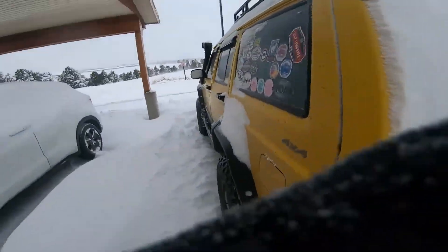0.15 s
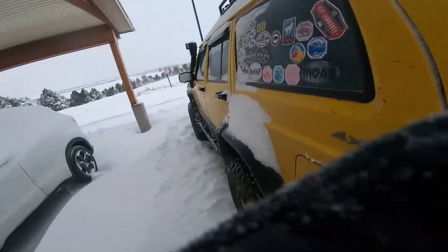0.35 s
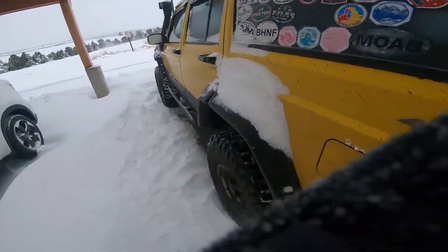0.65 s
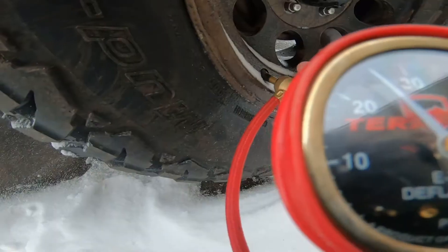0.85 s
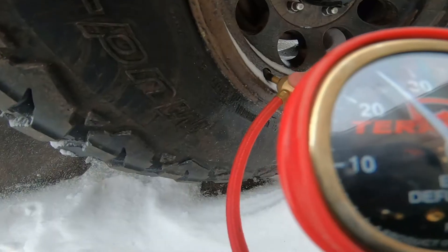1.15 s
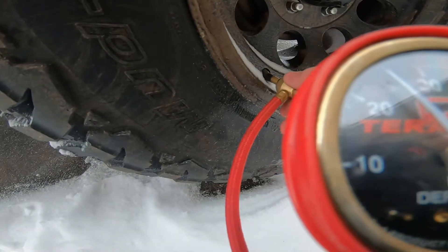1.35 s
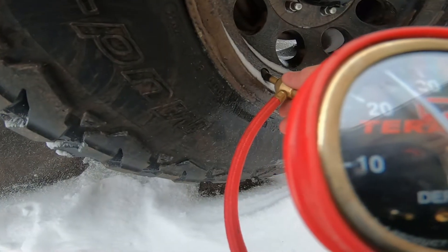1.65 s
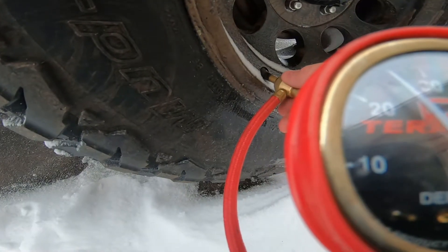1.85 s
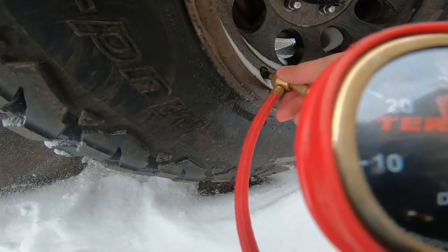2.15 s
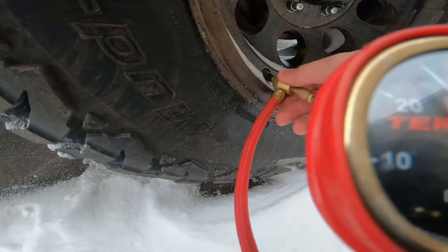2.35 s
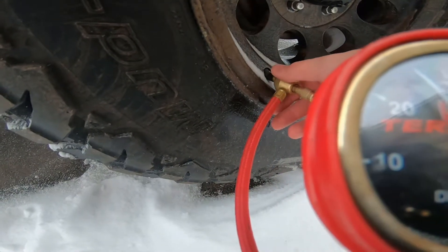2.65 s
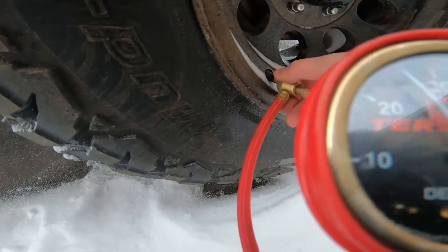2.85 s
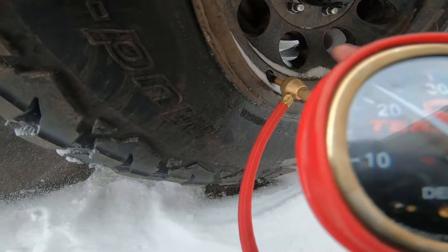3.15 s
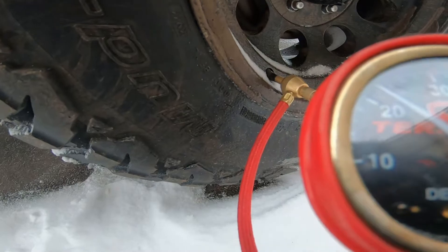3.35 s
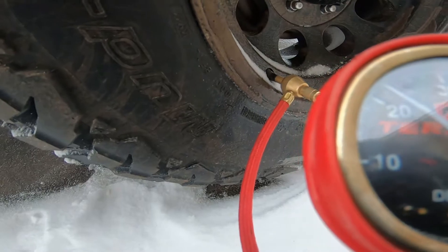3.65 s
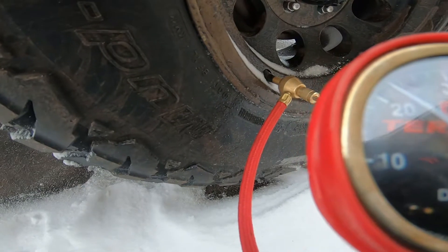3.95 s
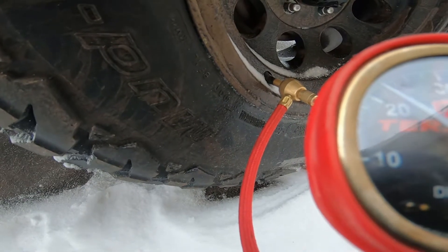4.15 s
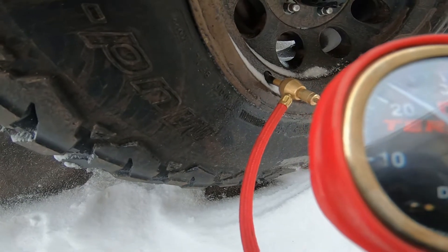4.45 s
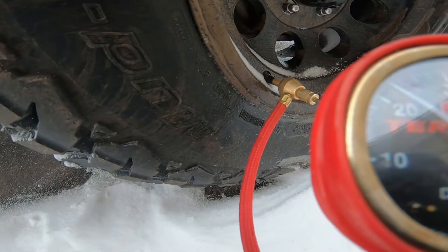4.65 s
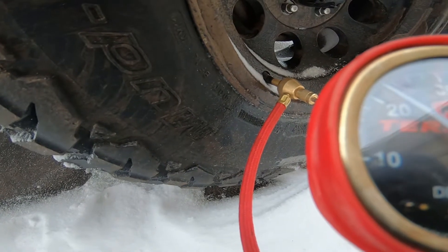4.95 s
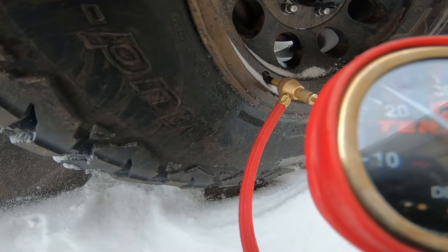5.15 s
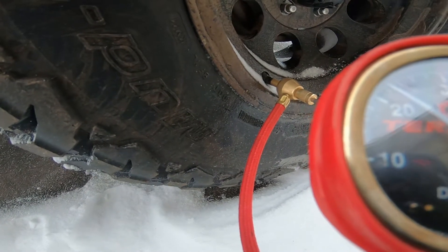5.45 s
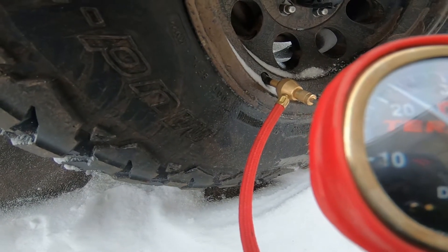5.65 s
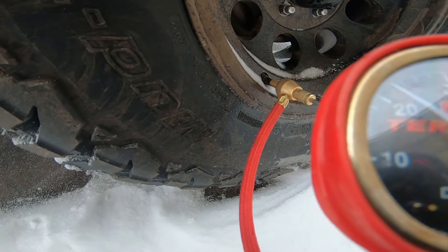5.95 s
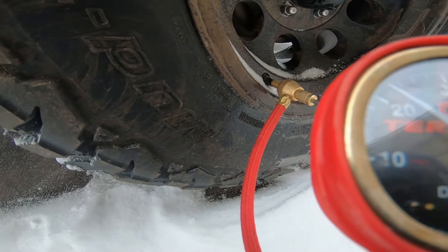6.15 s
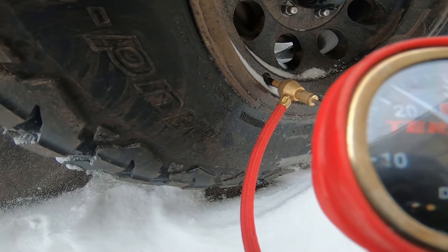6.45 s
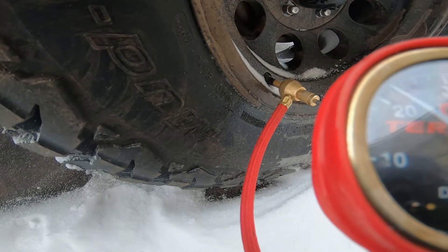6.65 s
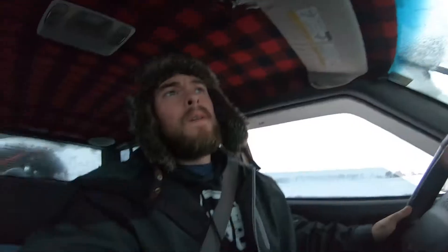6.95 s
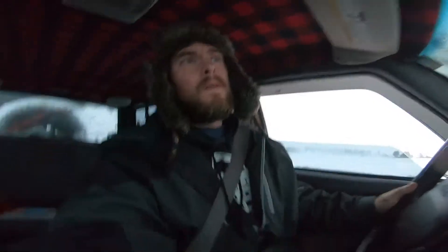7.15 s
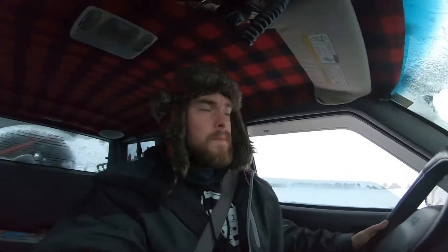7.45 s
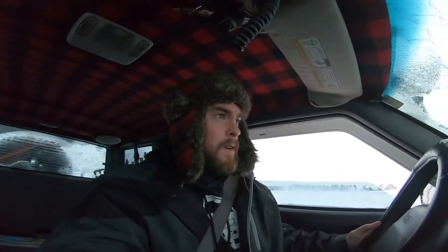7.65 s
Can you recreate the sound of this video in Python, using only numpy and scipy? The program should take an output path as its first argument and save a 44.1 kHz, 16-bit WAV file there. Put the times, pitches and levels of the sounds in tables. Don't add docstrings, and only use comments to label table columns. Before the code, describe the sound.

Handheld microphone beside a vehicle: half a second of crunchy, squeaky snow steps and cloth rubs over a dull exhaust idle, then brass chatter and thuds. Pressurised air hisses brightly in two releases, with engine putter and tappets exposed between them. Stereo narrows, widens, then narrows again under low wind gusts. An abrupt cut leads to deep, enclosed driving rumble with light rattles.

```python
import sys
import numpy as np
from scipy import signal
from scipy.fft import rfft, irfft
from scipy.io import wavfile
from scipy.ndimage import uniform_filter1d

SR = 44100
rng = np.random.default_rng(int(sys.argv[2]) if len(sys.argv) > 2 else 0)


def level_to_linear(level):
    exponent = np.asarray(level, float) / 20
    return 10 ** exponent


def transcribe(signal):
    frames = np.atleast_2d(signal).T
    limited = np.clip(frames, -1, 1)
    pcm = np.round(limited * 32767).astype(np.int16)
    wavfile.write(sys.argv[1], SR, pcm)


N = 343980
TIME = np.arange(N) / SR
HZ = np.fft.rfftfreq(N, 1 / SR) + 1e-3
SIDES = np.array([[1], [-1]])
CUT_S, CAB_START_S, CAB_FADE_S = 6.9154, 7.098, 0.06
EXHAUST_END_S = 0.785

# frequency in Hz, left over right in dB.
LEAN = [(200, -0.5), (1200, 2.5), (4200, 1.5), (5700, -3), (6300, 2.5), (7000, -3.5), (8100, -1), (8700, 8),
        (9300, -2), (10300, 14), (11300, -2.5), (15000, 9)]
# open in s, shut in s, level in dB, opening in dB per s.
RELEASES = [
    (.794, 2.25, -19, 2604),
    (2.988, 7.0, -20.5, 1699),
]


def rms_one(x):
    return x / np.sqrt(np.mean(x ** 2) + 1e-20)


def in_time(rows):
    s, *columns = np.transpose(rows)
    return [np.interp(TIME, s, c) for c in columns]


def at_hz(points):
    hz, value = np.transpose(points)
    return np.interp(np.log(HZ), np.log(hz), value)


def drift(rate_hz):
    r = np.exp(-80 * np.pi * rate_hz / SR)
    slow = signal.lfilter([1], [1, -2 * r, r * r], rng.standard_normal(N // 40 + 2002))[2000:]
    return np.interp(np.arange(N) / 40, np.arange(len(slow)), rms_one(slow))


def swell(start_s, end_s, db, rise_db_per_s, fall_db_per_s):
    coarse = TIME[::40, None]
    rise = rise_db_per_s * np.maximum(start_s - coarse, 0)
    fall = fall_db_per_s * np.maximum(coarse - end_s, 0)
    level_db = db - rise - fall
    return np.interp(TIME, coarse[:, 0], np.maximum(level_db.max(axis=1), -140))


def colour(x, spectrum, rings=(), under_db=0):
    power = level_to_linear(2 * (at_hz(spectrum) + under_db))
    for hz, width_hz, db in rings:
        power = power + level_to_linear(2 * db) / (1 + (2 * (HZ - hz) / width_hz) ** 2) ** 2
    return rms_one(irfft(rfft(x) * np.sqrt(power), N))


def ring(clicks, hz, t60_s):
    r, w = level_to_linear(-60 / (t60_s * SR)), 2 * np.pi * hz / SR
    return signal.lfilter([0, np.sin(w)], [1, -2 * r * np.cos(w), r * r], clicks + 1e-18)


def puff(t60_s):
    return level_to_linear(-60 * TIME[:6000] / t60_s) * rng.standard_normal(6000)


def add(out, s, x):
    start = round(s * SR)
    out[start:start + len(x)] += x


def apart(mid, side):
    # frequency in Hz, left-right likeness.
    likeness = [(60, 1.0), (150, 1.0), (380, 1.0), (950, 0.35), (2380, 0.32), (5980, 0.28), (15000, 0.42)]
    alike = np.clip(at_hz(likeness), -1, 1)
    ports = np.sqrt(1 + alike) * mid + np.sqrt(1 - alike) * side * SIDES
    return irfft(ports * level_to_linear(at_hz(LEAN) * SIDES / 2), N)


def cab():
    # frequency in Hz, density in dB per Hz.
    road = [(8.8, -25), (15, -34), (33, 5.5), (100, -7), (135, -0.5), (171, -14.5), (326, -19.5),
            (426, -32.5), (653, -35.5), (831, -40), (1060, -47.5), (1460, -44.5), (1860, -52.5),
            (3820, -58), (9000, -106), (11700, -128), (19800, -120)]
    # frequency in Hz, width in Hz, level in dB.
    cab_rings = [(132, 18, -0.5), (272, 60, -18), (1500, 60, -44), (6480, 12, -65)]
    # peak in s, boom in dB.
    bumps = [
        (7.588, -14),
        (7.732, -12.5),
    ]
    trim_air = [(1000, -13), (3000, 6.5), (4800, 0.5), (7000, -5.5), (11000, -18.0), (14000, -50.0)]
    trim_rings = [(3400, 400, 0.86), (6600, 200, -2)]

    s, db = np.transpose(bumps)
    boom_db = np.maximum(swell(s, s, db, 60, 60), -16.5)
    shake_s, shake_length_s = 7.208, 0.047
    shake_db = swell(shake_s, shake_s + shake_length_s, -44.5, 900, 900)
    rustle_db = np.maximum(shake_db, -61.5)
    boom = colour(rng.standard_normal(N), road, cab_rings)
    trim = colour(rng.standard_normal(N), trim_air, trim_rings)
    boom = 0.5 * np.tanh(level_to_linear(boom_db + 1.15) * boom / 0.5)
    fade_in = np.clip((TIME - CAB_START_S) / CAB_FADE_S, 0, 1) ** 2.3
    return fade_in * (boom + level_to_linear(rustle_db - 5.0) * trim)


def wind():
    # frequency in Hz, density in dB per Hz.
    spectrum = [(12, -49), (20, 9.5), (121, 7), (232, -6.5), (338, -9.5), (468, -13), (809, -22.5),
                (1200, -24.5), (1560, -43.5), (2640, -120)]
    # peak in s, level in dB, build-up in dB per s.
    gusts = [(.054, -31, 130), (.298, -28.5, 27.5), (.372, -42, 101), (.652, -41, 302), (5.6, -36, 497.5),
             (5.933, -25.5, 101), (6.028, -28, 324), (6.146, -23.5, 190), (6.288, -22.5, 42),
             (6.419, -22, 304), (6.556, -26, 47.5), (6.634, -30.5, 80), (6.758, -42, 131)]
    lumps = rng.standard_normal((2, N)) * level_to_linear(1.2 * drift(25))
    lumps = colour(lumps[0] + 0.45 * lumps[1] * SIDES, spectrum)
    s, db, build_db_per_s = np.transpose(gusts)
    return level_to_linear(swell(s, s, db, build_db_per_s, 499) + 3.0) * lumps


def whine():
    # time in s, frequency in Hz, level in dB.
    tone = [(0, 1400, -56.5), (.78, 1400, -49.5), (2.3, 1326, -53), (2.65, 1365, -52.5), (2.95, 1390, -59),
            (6.9, 1373, -60.5), (7.0, 1490, -58), (7.8, 1475, -58)]
    hz, db = in_time(tone)
    level = np.sqrt(2) * level_to_linear(db + 1.7 * drift(17))
    return level * np.sin(2 * np.pi * np.cumsum(hz + 7 * drift(18)) / SR)


def tappets(turns):
    # place in cycle 0-1, frequency in Hz, level in dB, t60 in s.
    ticking = [(0, 1640, -21, 0.026), (.5, 1620, -25, .03), (.7, 2600, -35, 0.01), (0, 2100, -20.5, 0.0075),
               (0, 2650, -25, .012), (.33, 2520, -24, .018), (.66, 2600, -29, .014)]
    ticks, white = 0, rng.standard_normal(N)
    for place, hz, db, t60_s in ticking:
        since = (turns / 6 - place) % 1
        pulse = since * np.exp(2 - since / 0.032) * 10
        ticks = ticks + level_to_linear(db) * rms_one(ring(ring(white, hz, t60_s), hz, t60_s / 2)) * pulse
    return ticks * np.where(TIME < EXHAUST_END_S, 0.3, 1)


def engine():
    # time in s, firings in Hz.
    speed = [(0.0, 38.6), (0.25, 39.73), (0.81, 39.86), (1.0, 39.54), (1.9, 39.04), (1.94, 38),
             (2.04, 38.9), (2.63, 38.3), (2.71, 38.8), (2.78, 39.43), (3.19, 39.24), (5.29, 39.3),
             (5.42, 39.3), (6.19, 39.92), (6.28, 38.5), (6.9, 37.2)]
    # time in s, level in dB.
    idle = [(0, -22.5), (.13, -26), (.55, -23.5), (1.0, -22), (1.48, -20), (2.92, -20.5), (3.54, -25.5),
            (4.3, -27.5), (5.89, -28.5), (6.2, -28.5), (6.8, -29)]
    # multiple of the firing rate, level in dB.
    firing = [(1, 0.5), (2, 2), (3, -12), (3.25, -9.5), (4, -15.5), (5, -18.5), (6, -23.5), (7, -37)]
    cylinders = [0.87, -0.028, 1, 1, 0.87, -0.64]
    # frequency in Hz, density in dB per Hz.
    bay_noise = [(15, -30), (25, 2), (60, -11.5), (91, -6.5), (249, -21), (418, -42.5), (475, -25.5),
                 (648, -34.5), (1240, -37), (1370, -35.5), (1480, -35.5), (2550, -39.5), (3850, -47),
                 (9760, -67.5), (12000, -79), (15600, -114), (22000, -120)]
    # frequency in Hz, width in Hz, level in dB.
    bay_rings = [(123, 20, -17), (256, 228, -29), (2600, 120, -43.5), (9620, 350, -66.5)]

    (firing_hz,), (level_db,) = in_time(speed), in_time(idle)
    turns = np.cumsum(firing_hz) / SR
    cycle_start_s = 2.42
    turns = turns - turns[round(cycle_start_s * SR)] + 120
    pushed = turns + 0.579
    fired = pushed.astype(int)
    strength_db = np.array(cylinders)[fired % 6] + 0.43 * rng.standard_normal(N // 500)[fired]
    sway = drift(3), drift(0.82)
    push = 0
    for i, (multiple, db) in enumerate(firing):
        push = push + level_to_linear(db + 0.16 * sway[i % 2]) * np.sin(2 * np.pi * multiple * pushed)
    push = rms_one(push) * level_to_linear(uniform_filter1d(strength_db, size=300)) * level_to_linear([[-0.7], [0.7]])
    push = np.where(TIME < EXHAUST_END_S, level_to_linear(-3.0) * uniform_filter1d(push, size=170), push)
    gate = 1 + 0.054 * np.cos(2 * np.pi * pushed)
    noise = apart(*rfft(rng.standard_normal((2, N))))
    bay = gate * colour(noise, bay_noise, bay_rings, under_db=-6)
    return level_to_linear(level_db) * (push + level_to_linear(-5.5) * bay + tappets(turns))


def steps():
    # start in s, length in s, crunch in dB, cloth in dB, squeak in dB.
    shifts = [(0, 0.0048, -44, -48, -60), (.115, 0.046, -42.5, -37, -56),
              (0.237, 0.0044, -33.5, -37, -37.5), (0.287, .03, -44.5, -51, -49),
              (0.348, .01, -37, -42, -34), (0.369, .012, -37, -42, -62), (0.42, .03, -40, -43, -40),
              (0.464, 0.005, -37.5, -44, -33), (0.496, .003, -52, -59, -46)]
    # frequency in Hz, density in dB per Hz.
    snow = [(800, -37), (1800, 1.5), (2500, -6), (3600, 1.5), (5000, -17), (7000, -34.5)]
    # frequency in Hz, density in dB per Hz.
    cloth_hiss = [(3000, -31), (5000, -2), (7000, 2), (8500, -4), (10000, -4), (11500, -22), (15000, -42),
                  (16000, -67.5)]

    s, length_s, crunch, cloth, sole = np.transpose(shifts)
    end_s = s + length_s
    press_db_per_s, lift_db_per_s, squeak_db_per_s = 598, 335.5, 247
    settle_db, creak_db, brush_db, brush_end_s = -56, -45, -52, 0.33
    crunch_db = np.maximum(swell(s, end_s, crunch, press_db_per_s, lift_db_per_s), settle_db)
    brush_db = swell(s[1], brush_end_s, brush_db, press_db_per_s, lift_db_per_s)
    cloth_db = np.maximum(swell(s, end_s, cloth, press_db_per_s, lift_db_per_s), brush_db)
    squeak_db = np.maximum(swell(s, end_s, sole, squeak_db_per_s, squeak_db_per_s), creak_db)

    grains = rng.standard_normal((2, N)) * level_to_linear(2.5 * drift(50))
    grains = grains[0] + 0.42 * grains[1] * SIDES
    crunching = level_to_linear(crunch_db - 3.0) * colour(grains, snow)
    brushing = level_to_linear(cloth_db - 4.5) * colour(grains, cloth_hiss)
    squeaking = level_to_linear(squeak_db - 4.0) * rms_one(ring(rng.standard_normal(N), 1490, 0.0082))
    walking = TIME < RELEASES[0][0]
    return walking * (crunching + brushing + squeaking)


def rubs():
    # start in s, length in s, frequency in Hz, width in Hz, level in dB.
    strokes = [(.005, 0.012, 7600, 2500, -54), (0.108, 0.027, 6000, 1500, -45),
               (.11, 0.079, 9400, 1200, -55.5), (0.123, .05, 3040, 700, -49),
               (.15, 0.038, 7200, 2010, -52.5), (0.223, 0.028, 3630, 700, -45), (.262, .02, 4300, 900, -45),
               (0.292, .005, 6400, 900, -49), (.33, .04, 3610, 500, -55), (0.353, .03, 7000, 2500, -51.5),
               (0.393, .03, 3600, 400, -49), (0.417, .025, 7600, 1500, -47), (.45, 0.028, 7650, 900, -51),
               (.469, 0.0087, 4500, 1200, -40), (.47, 0.011, 7000, 2000, -43), (.472, 0.01, 2820, 500, -39),
               (0.51, 0.0055, 6000, 3000, -63.5), (0.268, .02, 1550, 250, -42),
               (0.363, 0.014, 1620, 200, -41), (0.418, 0.072, 1310, 70.3, -39)]
    out = np.zeros((2, N))
    grains = rng.standard_normal((2, SR)) * level_to_linear(3.4 * drift(120)[:SR])
    grains = grains[0] + 0.3 * grains[1] * SIDES
    for s, length_s, hz, width_hz, db in strokes:
        t60_s = np.log(1000) / (np.pi * width_hz)
        band = rms_one(ring(ring(grains, hz, t60_s), hz, t60_s))
        out[:, :SR] += level_to_linear(swell(s, s + length_s, db, 900, 500)[:SR]) * band
    return out


def snaps(out):
    # time in s, ring in dB, frequency in Hz, t60 in s, crack in dB.
    hits = [(.015, -38, 1300, .01, -42), (0.235, -19, 1950, 0.0031, -27.5), (0.249, -34, 1500, .01, -39.5),
            (.3, -20, 1480, 0.017, -50), (0.347, -18, 1570, 0.0086, -34.5), (.35, -26, 1210, .02, -60),
            (.237, -30, 1350, .015, -60), (0.472, -27, 1360, 0.023, -35), (.515, -33, 1380, .01, -50),
            (7.143, -51, 3700, 0.0092, -65), (7.207, -31, 1250, 0.027, -52), (7.222, -34, 1310, .04, -59.5),
            (7.234, -41, 4500, .008, -47.5), (7.241, -38, 3300, .008, -44), (7.255, -38, 3440, .015, -55.5)]
    for s, db, hz, t60_s, crack_db in hits:
        body = ring(ring(puff(0.023), hz, t60_s), hz, 0.002)
        crack = signal.lfilter([0.5], [1, -0.5], puff(0.016))
        add(out, s, level_to_linear(db) * body / abs(body).max() + level_to_linear(crack_db + 6.5) * crack)


def rattle(out):
    # time in s, peak in dB.
    taps = [(.629, -37), (0.641, -30), (.652, -31.5), (.666, -23.5), (0.676, -25), (0.772, -36)]
    # frequency in Hz, level in dB, t60 in s.
    brass = [(4500, 5, 0.006), (2700, 10, .005), (1650, 3, .008), (6400, -9.5, .02), (6740, 0, .04),
             (8000, -8, 0.025), (11000, -20, 0.013)]
    tap_band = signal.butter(1, [1400, 5200], "band", fs=SR, output="sos")
    click = TIME[:6000] == 0
    for s, db in taps:
        rings = sum(level_to_linear(mode_db + rng.normal(0, 2.2)) * ring(click, hz, t60_s) for hz, mode_db, t60_s in brass)
        burst = signal.sosfilt(tap_band, puff(0.0039))
        add(out, s, level_to_linear(db - 14.5) * (rings + 3.9 * burst))


def thumps(out):
    # time in s, peak in dB, t60 in s.
    knocks = [(0.63, -28, 0.039), (0.643, -19.5, 0.063), (0.664, -20, 0.08), (6.151, -19, 0.085),
              (6.288, -20, 0.1), (6.406, -20, 0.041), (6.413, -25, 0.037), (6.514, -23, .04),
              (6.689, -27, 0.0393), (6.439, -28, 0.044), (6.541, -22, 0.03), (6.629, -26, 0.058)]
    dull = signal.butter(3, 340, fs=SR, output="sos")
    click = TIME[:6000] == 0
    for s, db, t60_s in knocks:
        thud = signal.sosfilt(dull, ring(click, 115, 0.34 * t60_s) + 1.3 * puff(t60_s))
        add(out, s, level_to_linear(db + 7.5) * thud / abs(thud).max())


def handling():
    out = np.zeros(N)
    snaps(out)
    rattle(out)
    thumps(out)
    return signal.sosfilt(signal.butter(6, 11500, fs=SR, output="sos"), out)


def valve(open_s, shut_s, db, opening_db_per_s):
    shut_db_per_s, echo_db, echo_db_per_s = 1747, -15, 421
    echo = swell(shut_s, shut_s, db + echo_db, shut_db_per_s, echo_db_per_s)
    return level_to_linear(np.maximum(swell(open_s, shut_s, db, opening_db_per_s, shut_db_per_s), echo))


def turbulence(shared_db, own_db):
    white, out, together = rfft(rng.standard_normal((2, N))), 0, drift(35)
    for low_hz in 125 * 2. ** np.arange(8):
        above = HZ >= low_hz * (low_hz > 125)
        band = irfft(white * (above & (HZ < 2 * low_hz)), N)
        out = out + band * level_to_linear(shared_db * together + own_db * drift(51))
    return rfft(out)


def jet_colour(x, spectrum, rings):
    db = at_hz(spectrum)
    for hz, width_hz, hump_db in rings:
        db = db + hump_db / (1 + (2 * (HZ - hz) / width_hz) ** 2)
    return rms_one(irfft(rfft(x) * level_to_linear(db), N))


def jets(width):
    # frequency in Hz, width in Hz, height in dB.
    first_air = [(150, -42), (400, -7.5), (800, -10), (1250, -3.5), (2500, -1.5), (4000, -6.5), (5000, -8),
                 (7300, -4.5), (8800, -9.5), (11500, -17.5), (13500, -17), (15600, -24), (16500, -62)]
    first_rings = [(1250, 200, 2), (2250, 150, -2), (2790, 240, 7), (3150, 250, -2), (3580, 280, 4),
                   (4330, 150, 2), (4100, 150, -2), (4870, 260, 5), (5560, 120, 2), (5800, 400, -5),
                   (6120, 450, -7), (7060, 200, 2), (7350, 200, -2), (7800, 250, 2), (8100, 200, 3),
                   (11200, 200, 4), (8350, 200, -2), (8850, 250, -3), (9100, 250, 2), (9450, 300, -3),
                   (10250, 300, 6), (10800, 220, 5), (11700, 350, -3), (12700, 700, 2), (13650, 300, 2)]
    pair_air = [(150, -70), (400, -17.5), (800, -17), (1250, -10.5), (2500, -4.5), (4000, -5.5),
                (5000, -10.5), (7000, -5), (8300, -5.5), (9500, -4), (11000, -15.5), (14000, -16),
                (15600, -28), (16500, -60)]
    pair_rings = [(2080, 250, 3), (2900, 500, 3), (4330, 220, -7), (4680, 180, 4), (5550, 250, 3),
                  (6250, 250, 2), (6500, 200, -2), (6950, 240, 6.5), (7480, 360, 5), (8300, 250, -4),
                  (8580, 220, 5), (8950, 120, 3), (9850, 380, 10), (11500, 300, -2)]
    port_air = [(290, -25.5), (750, -20), (1300, -9), (2500, -4), (3500, -9), (5000, -13), (6000, -21.5),
                (7700, -11.5), (9000, -26.5), (10300, -23.5), (12000, -27), (13000, -43), (14000, -38.5),
                (15000, -42.5)]
    port_rings = [(2100, 160, 5), (2300, 100, -2), (2930, 260, 7), (7900, 300, 2), (8450, 100, 4),
                  (11900, 500, -4), (3550, 150, 2), (4100, 200, 3), (4350, 250, -6), (4680, 250, 4),
                  (5450, 200, -3), (6800, 250, 2), (7000, 150, -2), (8300, 200, -3), (8800, 200, -6),
                  (9000, 200, 4), (9350, 250, -5), (10150, 300, 3), (10800, 400, 2)]
    side_air = [(150, -13), (500, -20), (1500, -16.5), (2500, -13.5), (3500, -15), (4500, -17.5),
                (5500, -9.5), (6800, -2), (8500, -4.5), (10300, -2), (11500, -10.5), (13500, -17.5),
                (15800, -24.5), (16500, -63.5)]
    side_rings = [(1000, 200, 3), (2100, 300, 5), (2350, 150, -4), (8200, 200, 3), (11700, 300, 3),
                  (4000, 250, -7), (5150, 250, -3), (6100, 200, -3), (7350, 200, -3), (9350, 250, -4),
                  (11300, 250, -5)]
    # frequency in Hz, left lead in radians.
    lead = [(200, 0), (7670, -0.21), (8180, 0.81), (8790, 1.7), (9470, 1.3), (10100, -0.72), (11000, -0.12)]

    mid, side = turbulence(shared_db=0.45, own_db=0.37)
    single = irfft(mid, N)
    first_noise = single + 0.6 * irfft(side * (HZ > 11200), N) * SIDES
    first = jet_colour(first_noise, first_air, first_rings)
    leaning = irfft(mid * level_to_linear(at_hz(LEAN) * SIDES / 2) * np.exp(0.5j * at_hz(lead) * SIDES), N)
    difference = level_to_linear(-6.0) * SIDES * jet_colour(irfft(side, N), side_air, side_rings)
    pair = jet_colour(leaning, pair_air, pair_rings) + difference
    port = jet_colour(single, port_air, port_rings)

    opening = TIME < 4.5
    folded = np.where(opening, level_to_linear(-3.0) * first, level_to_linear(3.0) * port)
    second = width ** np.where(opening, 0.45, 1) * pair + (1 - width) * folded
    second = second * level_to_linear(-2.5 * 3.6 * width * (1 - width) * (TIME > 4.5))
    top = irfft(rfft(second) * (HZ > 14300), N)
    second = second - top * np.clip((TIME - 6.2) / 0.12, 0, 1)
    return valve(*RELEASES[0]) * first + valve(*RELEASES[1]) * second


def scene():
    # time in s, stereo share 0-1.
    opening = [(0, 1), (.5, 0.02), (2.6, 0.01), (3, 0.32), (3.6, 0.9), (6.02, 1), (6.35, 0.22), (6.55, 0.2),
               (6.9, 0.09)]
    width = np.clip(in_time(opening)[0], 0, 1)
    around = engine() + steps() + rubs()
    middle = around.mean(axis=0)
    around = middle + np.sqrt(width) * (around - middle)
    outdoors = TIME < CUT_S
    tone = whine() * (outdoors + np.clip((TIME - CAB_START_S) / CAB_FADE_S, 0, 1))
    handled = handling() * level_to_linear(2.6 * width * SIDES)
    ending = np.clip((TIME[-1] - TIME) / 0.0015, 0, 1)
    return ending * (outdoors * (around + wind() + jets(width)) + handled + cab() + tone)


def roll_off(x):
    return signal.sosfilt(signal.butter(12, 15780, fs=SR, output="sos"), x)


def record(dry):
    return roll_off(dry)


dry = scene()
out = record(dry)
transcribe(out)
```